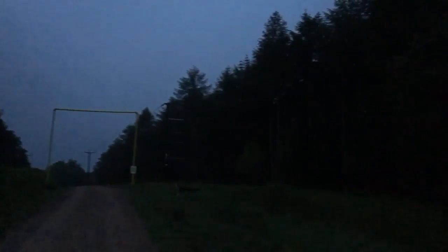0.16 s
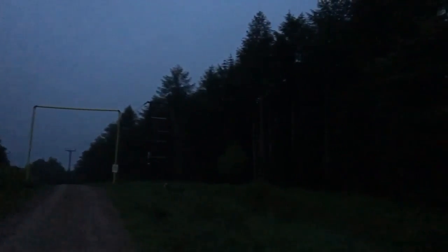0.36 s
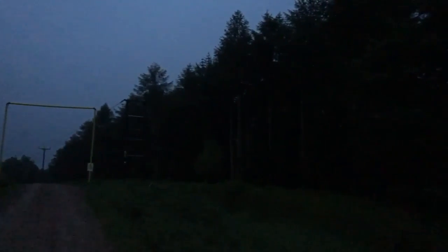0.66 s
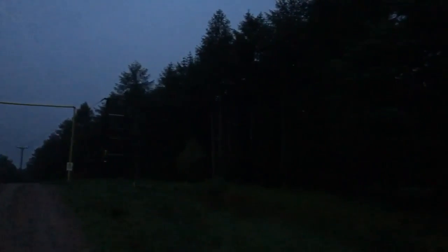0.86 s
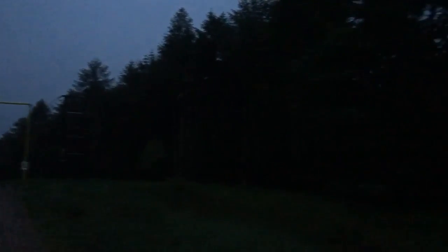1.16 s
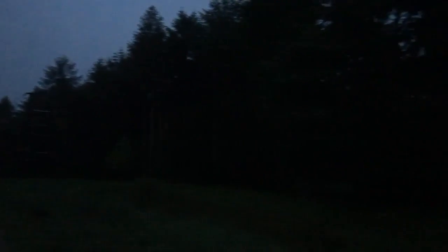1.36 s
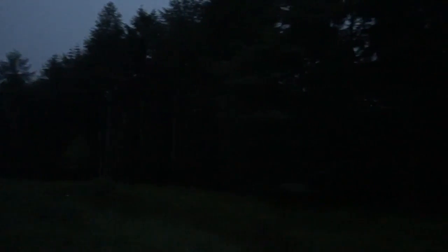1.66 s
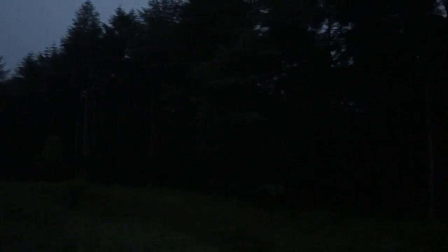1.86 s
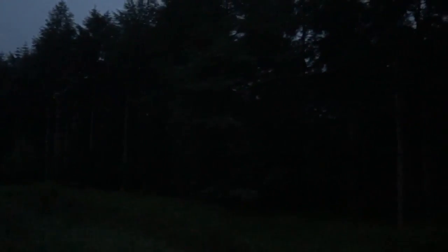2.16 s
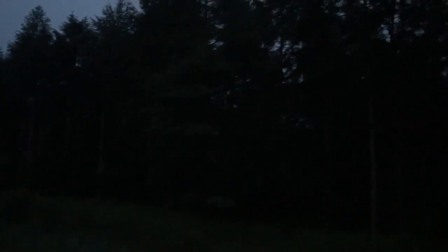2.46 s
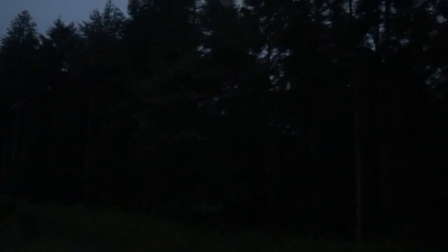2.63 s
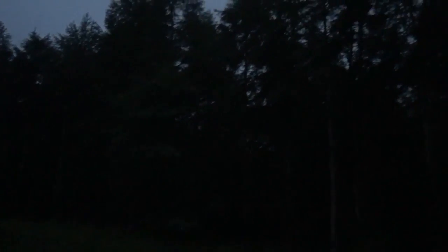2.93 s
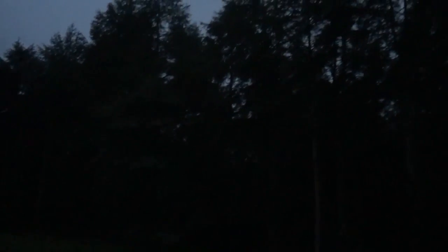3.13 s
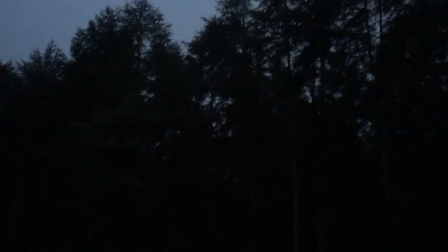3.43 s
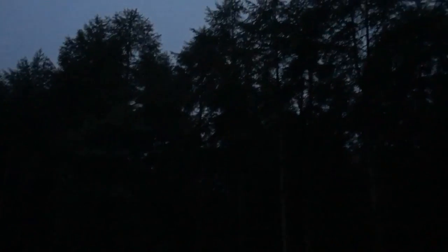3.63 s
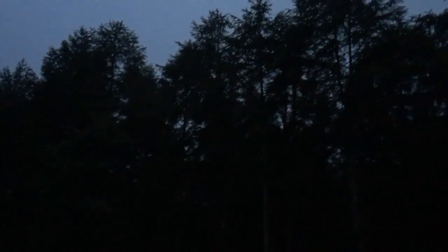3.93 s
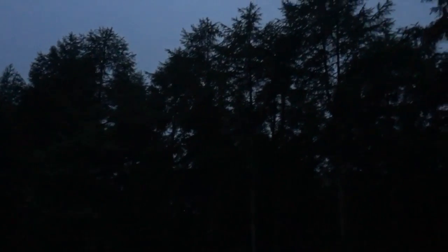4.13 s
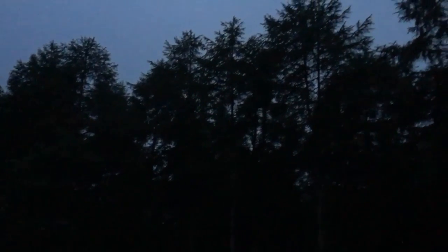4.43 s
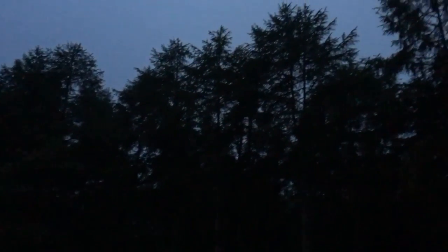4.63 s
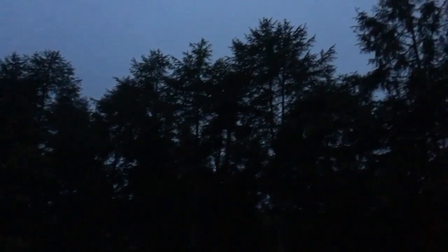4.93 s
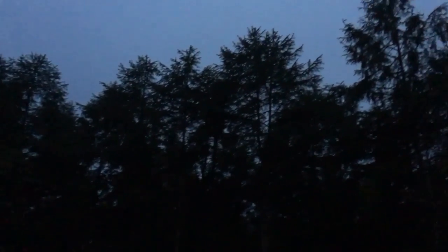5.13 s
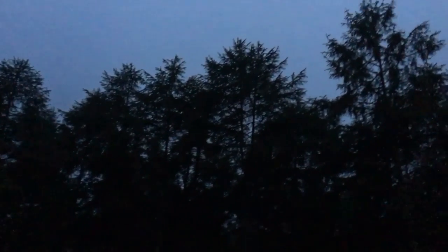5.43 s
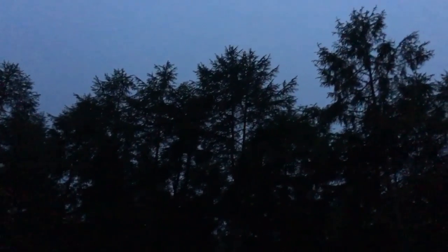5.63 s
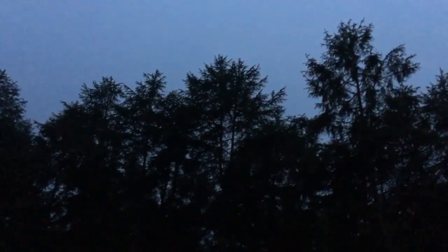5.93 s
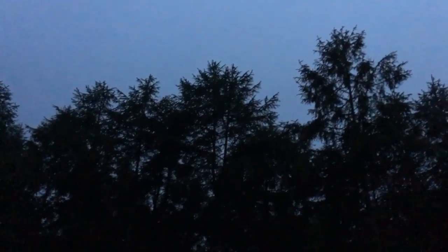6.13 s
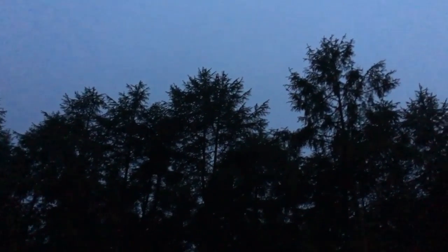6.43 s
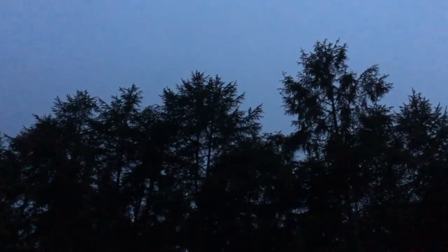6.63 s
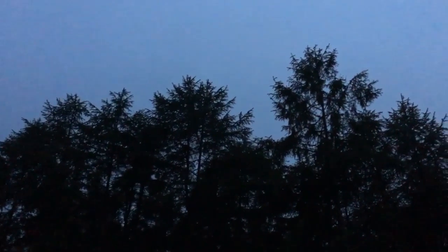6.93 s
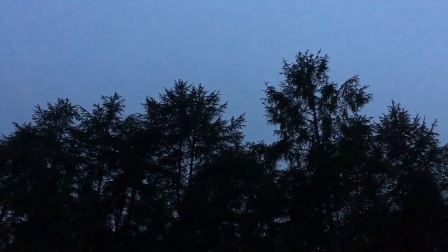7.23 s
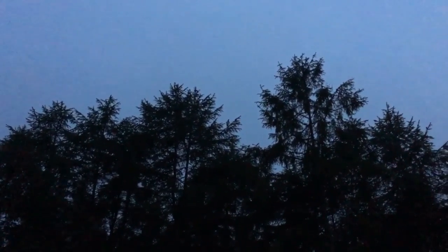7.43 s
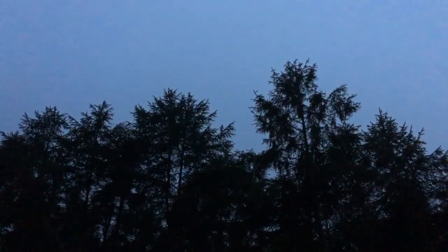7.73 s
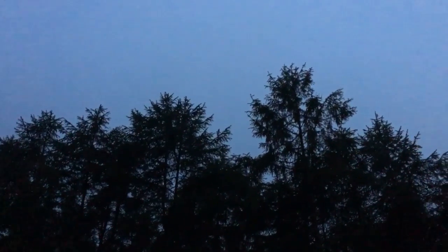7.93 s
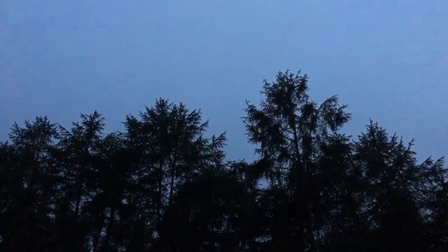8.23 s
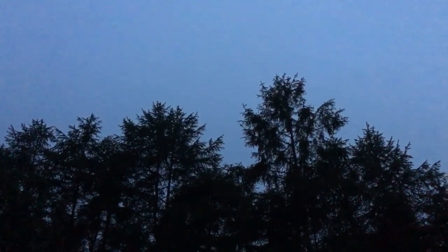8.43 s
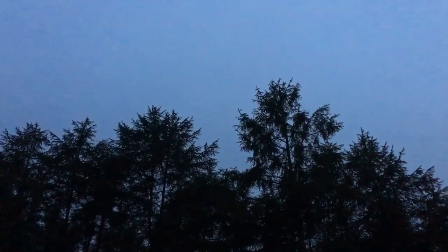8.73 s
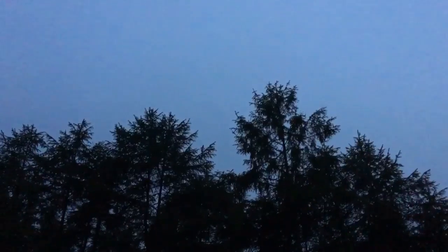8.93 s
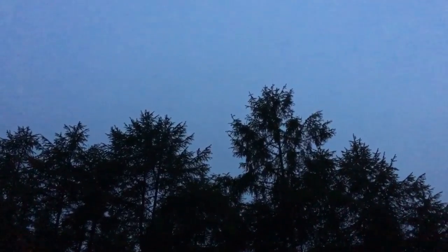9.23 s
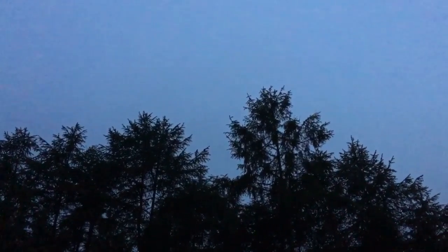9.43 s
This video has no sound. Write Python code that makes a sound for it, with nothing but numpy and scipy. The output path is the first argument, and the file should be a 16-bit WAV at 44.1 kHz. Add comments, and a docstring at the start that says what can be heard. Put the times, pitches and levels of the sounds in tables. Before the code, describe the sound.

A handheld mono microphone picks up a dense woodland dawn chorus: low mellow whistles, thin high notes, chips, trills and a few raspy buzzes, all blurred by woodland echo. Small handling squeaks open the scene over steady hiss. Wind is light at first, swells into heavy low thuds halfway through, and returns in shorter puffs while loud birds sing on.

```python
"""Dawn birds on a forest track

Many songbirds whistle, sweep and trill near and far: gliding sines, echoed by the trunks as fading noise tails.
Gusts buffet a bare mono microphone with low thuds, each a short slowing swing of pressure.
A stick-slip squeak from the hand-held camera comes early, with a faint whine at times, over steady hiss."""
import sys
import numpy as np
from scipy import signal
from scipy.fft import rfft, irfft, next_fast_len
from scipy.io import wavfile
from scipy.ndimage import uniform_filter1d

SR = 44100
rng = np.random.default_rng(int(sys.argv[2]) if len(sys.argv) > 2 else 0)


def bounce(signal):
    """Save signal as a 16-bit WAV file at the path given by the first command-line argument."""
    frames = np.transpose(np.atleast_2d(signal))
    limited = np.clip(frames, -1, 1)
    pcm = np.round(limited * 32767).astype(np.int16)
    wavfile.write(sys.argv[1], SR, pcm)


N = 422037

# notes by syllable: (delay [s], length [s], start [Hz], middle [Hz], end [Hz],
# start relative level [dB], end relative level [dB])
SYLLABLE_NOTES = { "falling trill": [(0, .028, 5550, 4720, 4300, -1, -4)],
                  "up and over": [(0, 0.0247, 5350, 5730, 5800, -11, 0),
                  (.027, .045, 5830, 6800, 7530, -2.5, -17.5), (.087, .04, 5900, 4900, 4250, -9.5, -13)],
                  "see-saw": [(0, .055, 6230, 4870, 3990, 0, -1.5), (.078, .05, 5540, 6020, 6880, -5, -8)],
                  "steep slur": [(0, .012, 5500, 5470, 5360, -1.5, -2),
                  (.012, .045, 5385, 4370, 3490, -6, -8)], "thin slur": [(0, .014, 6900, 7400, 7620, -2, 2),
                  (.014, .085, 7680, 7350, 6900, -2, 1.5), (.099, .01, 6900, 6700, 6300, 0, -6)],
                  "high arch": [(0.00093, .13, 7050, 7350, 7000, -5, -2)],
                  "hook and pipe": [(0, 0.0394, 3150, 3660, 3600, -4, -0.5),
                  (.04, .01, 3600, 3290, 2920, -7, -5), (.095, .1, 2650, 2740, 2680, -7, -3.5)],
                  "drop and hold": [(0, .02, 3750, 3460, 3250, -3, -1),
                  (.02, .09, 3240, 3147, 3080, 0.5, -7.5)],
                  "short drop": [(0, .025, 2600, 2300, 1940, -0.5, 0.5)],
                  "small arch": [(0, .065, 4000, 4330, 4000, 0, 0)],
                  "thin chip": [(0.0037, .035, 8400, 7350, 6400, -12, 0)],
                  "tick": [(0, .02, 6400, 6000, 5750, -1.5, -2.5), (0, .02, 5150, 4600, 4680, -4, -1)],
                  "steep chip": [(0, .017, 5700, 4300, 3650, -0.5, 1)],
                  "low chip": [(0.0012, 0.0279, 3050, 2300, 2070, -0.5, -4.5)],
                  "flat pipe": [(0.00061, 0.093, 3720, 3720, 3720, -1.5, -1)],
                  "low coo": [(0, .058, 1378, 1505, 1527, -5, -0.5), (0, 0.059, 2770, 3000, 3040, -14, -8)],
                  "chatter": [(0, 0.0326, 4500, 4350, 4250, -1.5, 0)]}
# repeats by syllable: (time [s], level [dB])
SYLLABLE_TIMES = { "falling trill": [(4.811, -62), (4.891, -61), (4.963, -63), (5.038, -62.5), (5.114, -62),
                  (5.191, -59), (5.266, -59), (5.341, -60), (5.417, -62), (5.487, -63), (5.572, -63)],
                  "up and over": [(6.438, -50.5), (6.6, -49), (6.766, -49), (6.927, -49), (7.098, -50.5)],
                  "see-saw": [(2.873, -62.5), (3.085, -63.5), (3.301, -64)], "steep slur": [(7.285, -57),
                  (7.4, -54.5), (7.514, -54), (7.628, -53.5), (7.743, -54)], "thin slur": [(9.005, -59.5),
                  (9.218, -61.5), (9.432, -61)], "high arch": [(.235, -78), (.68, -77), (.86, -77),
                  (1.15, -78), (2.14, -76), (2.6, -75)], "hook and pipe": [(8.515, -55), (8.815, -53.5),
                  (9.155, -53.5)], "drop and hold": [(2.03, -57.5), (2.237, -58)],
                  "short drop": [(2.245, -59), (2.338, -63), (2.528, -59.5), (2.628, -62)],
                  "small arch": [(.098, -68), (.21, -70)], "thin chip": [(8.38, -60), (8.415, -58),
                  (8.45, -57), (8.494, -57)], "tick": [(3.826, -64), (4.03, -65.5), (4.244, -68),
                  (4.502, -66.5)], "steep chip": [(.925, -69), (1.105, -69), (1.653, -62), (1.687, -65),
                  (1.734, -66), (1.83, -75), (1.936, -65.5), (2.437, -68)], "low chip": [(5.387, -59.5),
                  (5.538, -58), (5.581, -58), (6.018, -62), (5.95, -61), (6.118, -55.5), (6.166, -55),
                  (8.451, -60)], "flat pipe": [(.76, -73), (1.06, -74), (1.27, -78), (1.512, -71),
                  (1.77, -75), (1.91, -72), (2.12, -76), (2.22, -75), (2.35, -81), (4.235, -69.5),
                  (5.06, -66), (5.427, -61.5), (5.56, -73), (5.78, -61), (5.9, -71), (7.5, -67.5),
                  (7.66, -65.5), (8.66, -68), (8.957, -70), (9.36, -66.5), (9.44, -64)],
                  "low coo": [(2.207, -65.5), (2.279, -66), (2.484, -64), (2.585, -64.5)],
                  "chatter": [(7.107, -48.5), (7.155, -51.5), (7.265, -50.5), (7.297, -50), (7.335, -52),
                  (7.373, -52), (7.42, -58), (7.46, -60), (7.51, -60), (7.56, -63), (7.61, -60)]}


def undb(db):
    """Level in dB to amplitude."""
    return 10 ** (np.asarray(db) / 20)


def unit(x):
    """Scale to rms 1."""
    return x / np.sqrt(np.mean(x ** 2))


def curve(table):
    """Interpolate the columns of a (time [s], ...) table at every sample."""
    time_s, *columns = np.transpose(table)
    return [np.interp(np.arange(N) / SR, time_s, column) for column in columns]


def add(out, start_s, x):
    """Mix x into out from start_s, cropped to fit."""
    i = int(start_s * SR)
    a, b = max(i, 0), min(i + len(x), len(out))
    if b > a:
        out[a:b] += x[a - i:b - i]


def walk(rate_hz):
    """Random levels held 1 / rate_hz and slewed twice; rms 1."""
    hold = int(SR / rate_hz)
    steps = np.repeat(rng.standard_normal(N // hold + 1), hold)
    slewed = uniform_filter1d(uniform_filter1d(steps, hold), hold)
    return unit(slewed[:N])


def whistle(length_s, start_hz, middle_hz, end_hz, start_db, end_db, fade_s, turn):
    """A sine of rms level dB whose pitch follows a parabola through three points, with soft ends."""
    t = np.arange(-fade_s, length_s + fade_s, 1 / SR)
    u = 2 * t / length_s - 1  # -1 at the start, 1 at the end
    slope = (end_hz - start_hz) / 2
    bow = (start_hz + end_hz) / 2 - middle_hz
    hz = middle_hz + u * slope + u * u * bow
    edge = np.clip(np.minimum(t + fade_s, length_s + fade_s - t) / (2 * fade_s), 0, 1)
    level_db = start_db + (end_db - start_db) * t / length_s
    gain = undb(level_db) * np.sin(np.pi / 2 * edge) ** 2
    return np.sqrt(2) * gain * np.sin(2 * np.pi * (np.cumsum(hz) / SR + turn))


def forest(x, t60_s, onset_s=0.0045):
    """Scatter off wood: a noise tail of unit energy that swells in over onset_s and fades 60 dB in t60_s."""
    t = np.arange(int(1.5 * SR)) / SR
    tail = rng.standard_normal(len(t)) * undb(-60 * t / t60_s) * (1 - np.exp(-t / onset_s))
    return signal.fftconvolve(x, tail / np.sqrt(np.sum(tail ** 2)))[:len(x)]


def hiss(level_db=-68):
    """Steady noise of air and electronics, shaped in frequency."""
    # spectrum: (frequency [Hz], relative density [dB])
    hiss_spectrum = [(18, -28), (30, 4), (66, 3.5), (480, -11.5), (1140, -16), (2190, -12), (3410, -29),
                     (5460, -27), (6910, -38), (7880, -22), (15600, -30)]
    hz, db = np.transpose(hiss_spectrum)
    size = next_fast_len(N)
    bin_hz = np.arange(size // 2 + 1) * SR / size
    shape = undb(np.interp(np.log(bin_hz + 1), np.log(hz), db))
    noise = irfft(rfft(rng.standard_normal(size)) * shape, size)[:N]
    return unit(noise) * undb(level_db)


def camera(whine_hz=12000):
    """A stick-slip squeak whose body favours a few multiples of the slip rate, and a faint electronic whine."""
    # squeak bursts: (time [s], length [s], slip rate [Hz], level [dB])
    squeak_bursts = [(0.37, 0.04, 1665, -57), (0.437, 0.042, 1666, -56), (0.484, 0.027, 1670, -75),
                     (0.547, 0.036, 1700, -60.5), (0.612, 0.039, 1720, -61.5), (0.676, 0.05, 1690, -77)]
    # body response: (multiple of slip rate, relative level [dB])
    squeak_orders = [(3, 3), (5, -6.5), (6, -19), (8, -25), (9, -27.5)]
    # whine: (time [s], length [s], level [dB])
    whine_spans = [(0, 0.17, -80.5), (8.4, 1, -91)]
    squeak = np.zeros(N)
    for s, length_s, slip_hz, db in squeak_bursts:
        for k, order_db in squeak_orders:
            hz, part_db = k * slip_hz, db + order_db
            part = whistle(length_s, hz, 1.004 * hz, .985 * hz, part_db, part_db - 2.0, 0.0047, 0)
            add(squeak, s, part)
    out = squeak * undb(2.6 * walk(152.2)) + undb(-5.5) * forest(squeak, 0.71)
    for s, length_s, db in whine_spans:
        add(out, s, whistle(length_s, whine_hz, whine_hz, whine_hz, db, db, 0.027, 0))
    return out


def crowd(range_hz, base_length_s, sweep, direct_db, count):
    """Many chance notes of like strength, mostly falling, heard more as echo than directly; rms about 1."""
    lead_s = 1  # already singing before the start
    direct = np.zeros(N + lead_s * SR)
    low_hz, high_hz = range_hz
    for when, pitch, a, b, c, size in rng.random((count, 6)):
        hz = low_hz * (high_hz / low_hz) ** pitch
        bend_hz = hz * sweep * (1.406 * a - .4)
        middle_hz = hz * (1 + sweep * (c - .5) / 2)
        length_s = base_length_s * (0.392 + 1.612 * b)
        db = 9 * size
        note = whistle(length_s, hz + bend_hz, middle_hz, hz - bend_hz, db, db, 0.00582, c)
        add(direct, when * len(direct) / SR, note)
    return unit(undb(direct_db) * direct + forest(direct, 0.67))[-N:]


def far_birds():
    """Far birds too many to tell apart: low whistlers warble; the higher crowds give short steep sweeps."""
    # (time [s], low crowd level [dB], middle crowd level [dB], high crowd level [dB])
    chorus_levels = [(0.0, -56, -67, -69), (0.48, -62, -67, -78), (1.97, -62, -72, -71.5),
                     (2.93, -73, -69, -74.5), (3.33, -67, -71, -68), (4.58, -72, -69, -81.5),
                     (5.3, -72.5, -64, -76), (5.99, -66, -67, -74), (6.9, -60.5, -69, -73),
                     (7.2, -59, -62, -67.5), (7.46, -61.5, -62, -73), (9.57, -65.5, -67, -71)]
    low_db, mid_db, high_db = curve(chorus_levels)
    low = crowd((1645.5, 2889), 0.04434, 0.0709, -0.25, count=1100)
    mid = crowd((2900, 5596), .016, 0.1404, -2.3, count=1700)
    high = crowd((5500, 7486), 0.0199, 0.0506, -3.5, count=900)
    return low * undb(low_db) + mid * undb(mid_db) + high * undb(high_db)


def gust(breeze_db=-69.5, rise_db_per_s=249, fall_db_per_s=204):
    """Wind level in dB: each puff rises, holds and falls back into a light breeze; powers add."""
    # puffs: (time [s], hold [s], level [dB])
    wind_puffs = [(.1, 0.048, -55.5), (0.353, .04, -56.5), (2.682, 0.11, -61), (3.27, .05, -61),
                  (3.897, .1, -51.5), (4.029, 0.038, -44.5), (4.183, 0.018, -44), (4.292, 0.02, -44.5),
                  (4.731, 0.4, -47), (5.1, 0.52, -39), (5.7, 0.39, -42), (6.173, 0.025, -48.5),
                  (6.337, 0.18, -54.5), (6.547, 0.035, -43.5), (6.685, 0.0088, -55), (6.859, 0.062, -50.5),
                  (7.089, 0.031, -51), (7.336, 0.065, -46), (7.464, .2, -53.5), (7.697, 0.15, -44),
                  (7.968, 0.038, -52), (8.163, 0.051, -53), (8.487, 0.49, -57), (9.077, 0.051, -46),
                  (9.207, 0.14, -45.5), (9.508, 0.12, -47)]
    t = np.arange(N) / SR
    power = np.full(N, undb(2 * breeze_db))
    for s, hold_s, db in wind_puffs:
        near = slice(max(int((s - .5) * SR), 0), int((s + hold_s + .5) * SR))
        before_db = rise_db_per_s * (s - t[near])
        after_db = fall_db_per_s * (t[near] - s - hold_s)
        below_db = np.maximum(np.maximum(before_db, after_db), 0)
        power[near] += undb(2 * (db - below_db))
    return 10 * np.log10(power)


def eddy(hz, db, turn, cycles=.3, slowing=.15):
    """A vortex passing the port: about one swing of pressure that starts quick and slows."""
    u = np.arange(-2, 2, hz / SR)  # cycles from the centre
    return undb(db) / np.cosh(u / cycles) * np.cos(2 * np.pi * (u - slowing * u * u + turn))


def wind(slow_hz=48, count=900):
    """Small eddies all the time, quicker when the gust is strong, under the big ones."""
    # strongest eddies: (centre time [s], centre frequency [Hz], envelope peak [dB])
    big_eddies = [(4.184, 156, -35.5), (4.754, 155, -35), (5.111, 70, -28.5), (5.127, 141, -28.5),
                  (5.149, 57.5, -29.5), (5.238, 107, -36), (5.253, 92.5, -29.5), (5.266, 262, -25),
                  (5.273, 158, -26.5), (5.286, 213, -28.5), (5.296, 162, -32), (5.335, 91, -30),
                  (5.351, 168, -23), (5.362, 68, -27), (5.386, 166, -30), (5.4, 121, -34),
                  (5.421, 89, -28.5), (5.447, 140, -35), (5.46, 220, -26.5), (5.472, 140, -26.5),
                  (5.484, 165, -21), (5.501, 184, -29.5), (5.546, 90, -31), (5.564, 90, -35.3),
                  (5.622, 79.4, -29), (5.681, 92.5, -39), (5.785, 235, -31.5), (5.844, 135, -28.5),
                  (5.859, 118, -31), (5.892, 138, -37), (5.941, 211, -23.5), (5.95, 103, -29),
                  (6.015, 120, -39), (6.067, 130, -29.5), (6.085, 87, -28), (4.072, 131, -39.5),
                  (4.272, 109, -40), (4.722, 176, -38), (4.83, 140, -37.5), (5.024, 158, -38),
                  (6.562, 172, -38), (7.762, 159, -37.5), (7.806, 168, -37.5), (7.858, 121, -39),
                  (9.552, 141, -42), (7.343, 91, -34), (7.719, 171, -31.5), (9.301, 126, -33)]
    gust_db = gust()
    small, big = np.zeros(N), np.zeros(N)
    for when, pitch, size, turn in rng.random((count, 4)):
        octaves = np.clip((gust_db[int(when * N)] + 73.5) / 13, .3, 2.3)
        hz = slow_hz * 2 ** (octaves * pitch ** 1.5)
        add(small, when * N / SR, eddy(hz, -4.0 * np.log(size + .1), turn))
    small /= np.sqrt(uniform_filter1d(small ** 2, int(.07 * SR)) + 1e-9)  # even out the level
    for (s, hz, db), turn in zip(big_eddies, rng.random(len(big_eddies))):
        swing = eddy(hz, db, turn)
        add(big, s - len(swing) / SR / 2, swing)
    # small eddies fill what the big ones leave of the gust's power, never under 74 % of it
    gust_power = undb(2 * gust_db)
    room = gust_power - uniform_filter1d(big ** 2, int(.06 * SR))
    return big + small * np.sqrt(np.maximum(room, 0.74 * gust_power))


def buzzes(swing_hz=250, rate_hz=130):
    """The pitch swings over a hundred times a second, unevenly, so the note turns to a rasp."""
    # (time [s], length [s], start [Hz], end [Hz], level [dB])
    buzzy_notes = [(2.65, 0.162, 4450, 4300, -67.5), (2.95, 0.1, 3700, 4100, -65.5),
                   (7.04, .16, 3400, 2950, -61.5), (6.66, 0.043, 2150, 2200, -53.5),
                   (9.13, 0.083, 5000, 5000, -67)]
    out = np.zeros(N)
    uneven_hz = rate_hz * undb(1.5 * walk(40))
    shake_rad = swing_hz / rate_hz * np.sin(2 * np.pi * np.cumsum(uneven_hz) / SR)
    for s, length_s, start_hz, end_hz, db in buzzy_notes:
        add(out, s, whistle(length_s, start_hz, (start_hz + end_hz) / 2, end_hz, db, db, 0.0097, 0))
    analytic = signal.hilbert(out, next_fast_len(N))[:N]
    return np.real(analytic * np.exp(1j * shake_rad))


def trills():
    """One quick chip repeated evenly, each a little stronger or weaker."""
    # (time [s], spacing [s], chips, length [s], start [Hz], middle [Hz], end [Hz], mean level [dB])
    chip_runs = [(7.33, .0475, 7, .016, 1950, 2300, 3000, -58),
                 (1.305, .081, 4, .022, 5200, 4300, 3950, -67), (1.77, .03, 5, .014, 6200, 4900, 3800, -69)]
    out = np.zeros(N)
    for s, spacing_s, count, *note, db in chip_runs:
        for k, vary_db in enumerate(rng.standard_normal(count)):
            add(out, s + k * spacing_s, whistle(*note, db + vary_db, db + vary_db, .003, 0))
    return out


def repeaters(fade_s=.005, pitch_spread=.003):
    """Each near singer repeats its syllable, a little higher or lower every time."""
    out = np.zeros(N)
    for name, times in SYLLABLE_TIMES.items():
        for (s, db), (shift, turn) in zip(times, rng.standard_normal((len(times), 2))):
            for delay_s, length_s, *hz, start_db, end_db in SYLLABLE_NOTES[name]:
                shifted_hz = np.multiply(hz, 1 + pitch_spread * shift)
                note = whistle(length_s, *shifted_hz, db + start_db, db + end_db, fade_s, turn)
                add(out, s + delay_s - fade_s, note)
    return out


def single_whistles(fade_s=.005):
    """Whistles sung once, each a gliding sine."""
    # (time [s], length [s], start [Hz], middle [Hz], end [Hz], start level [dB], end level [dB])
    song_notes = [(0.051, 0.055, 2630, 2597, 2215, -56, -43), (0.093, 0.14, 1560, 1690, 1820, -62, -59.5),
                  (0.102, 0.14, 2180, 2172, 2310, -51, -46.5), (0.653, 0.038, 3390, 3000, 2800, -65, -63),
                  (0.658, 1.4, 5980, 6004, 5890, -83, -79), (0.673, 0.092, 1880, 1996, 2200, -53.5, -53.5),
                  (0.911, 0.043, 2130, 1845, 1370, -50.5, -72), (1.012, 0.022, 3900, 3510, 3280, -66, -58),
                  (1.015, 0.19, 2590, 2800, 3000, -63, -64), (1.144, 0.053, 1964, 1927, 2074, -53, -50),
                  (1.195, 0.12, 2043, 2086, 1997, -48, -50), (1.216, 0.04, 3200, 3093, 3150, -63, -58),
                  (1.369, 0.084, 2060, 2056, 2080, -58, -58), (1.403, 0.1, 2590, 2450, 2325, -61, -57),
                  (1.55, 0.115, 2425, 2340, 2140, -63, -54.5), (1.7, 0.04, 1950, 1870, 1800, -58, -63),
                  (1.79, 0.09, 2000, 2170, 1980, -60, -56), (0.72, 0.19, 2930, 2785, 2910, -66, -69),
                  (1.15, 0.12, 4950, 4770, 4730, -71, -75), (2.35, 0.15, 3095, 3056, 3090, -67, -71),
                  (2.37, 0.047, 2204, 2050, 1900, -64, -62), (1.96, 0.035, 1890, 2150, 2500, -57, -61),
                  (2.01, 0.057, 2600, 2550, 2480, -61, -62), (2.05, 0.04, 2100, 2000, 1910, -61, -57),
                  (2.08, 0.045, 2440, 2450, 2250, -60, -59), (2.16, 0.04, 2285, 2550, 2350, -62, -60),
                  (2.55, 0.11, 6100, 5520, 5360, -65, -62), (2.579, 0.05, 2485, 3020, 3123, -80, -58),
                  (2.734, 0.05, 7030, 6500, 6100, -70, -68), (3.09, 0.19, 7170, 7020, 6900, -74, -72),
                  (3.1, 0.23, 1797, 1836, 1774, -71.5, -70.5), (3.38, 0.12, 1950, 1804, 1810, -63.5, -72),
                  (3.72, 0.09, 2850, 2925, 2950, -67, -70), (4.655, 0.025, 6100, 5700, 5490, -70, -62),
                  (3.36, 0.1, 7050, 7090, 7110, -80, -65), (3.565, 0.12, 2910, 2305, 2603, -67, -60.5),
                  (3.626, 0.025, 7160, 7100, 6600, -76, -61), (3.674, 0.054, 2498, 2580, 2920, -62, -68),
                  (4.014, 0.28, 2044, 1927, 2125, -61.5, -74), (4.112, 0.04, 6400, 7030, 6350, -67, -74),
                  (4.424, 0.17, 2224, 2297, 2104, -61, -72), (4.446, 0.36, 8100, 7570, 7630, -75, -89.5),
                  (4.685, 0.04, 3000, 3260, 3230, -78, -56), (4.678, 0.14, 5560, 5430, 5700, -60.5, -74),
                  (4.702, 0.075, 1696, 1344, 1290, -69, -76), (4.775, 0.083, 3390, 3340, 3080, -68, -64),
                  (4.778, 0.091, 1260, 1214, 1184, -75, -74), (4.872, 0.049, 2750, 3980, 4600, -62.5, -68),
                  (5.058, 0.066, 3060, 3430, 3440, -61.5, -63), (5.203, 0.2, 1500, 1350, 1216, -79, -76),
                  (5.303, 0.048, 3820, 3550, 3050, -72, -59), (5.348, 0.1, 3340, 3335, 3030, -66, -62),
                  (5.47, 0.19, 1660, 1782, 1921, -68.5, -51.5), (5.608, 0.027, 7700, 6770, 6600, -73, -65),
                  (5.75, 0.19, 2204, 2260, 2233, -57, -50.5), (5.95, 0.17, 2270, 2198, 1890, -58.5, -54.5),
                  (5.65, 0.11, 6700, 6720, 6380, -72, -64.5), (6.008, 0.044, 6230, 4980, 4400, -69, -63),
                  (6.19, 0.2, 5570, 5480, 5480, -70, -76), (6.352, 0.17, 3950, 4250, 4230, -67, -70),
                  (6.142, 0.25, 2043, 1800, 1687, -55, -59), (6.147, 0.091, 5400, 6590, 6590, -59.5, -62.5),
                  (6.244, 0.04, 6500, 6220, 6150, -55, -75), (6.407, 0.12, 2370, 2225, 2750, -67, -56),
                  (6.539, 0.033, 2510, 2564, 2400, -54, -52), (6.571, 0.021, 2424, 2000, 1420, -43.5, -70),
                  (6.671, 0.11, 2206, 2412, 2430, -48, -86), (6.721, 0.076, 7930, 7950, 8250, -76, -69),
                  (6.824, 0.1, 2256, 2363, 2304, -49, -47.5), (6.945, 0.09, 3800, 3350, 2990, -62, -49),
                  (6.972, 0.11, 10400, 9110, 8140, -79, -76), (7.09, 0.014, 4500, 4150, 4050, -53, -50),
                  (7.07, 0.023, 2880, 2700, 2550, -57, -54), (7.49, 0.08, 1294, 1550, 1680, -72, -68),
                  (7.129, 0.17, 1880, 1885, 1794, -70, -63), (7.234, 0.035, 1990, 3130, 2120, -49, -56),
                  (7.254, 0.017, 3700, 3950, 4420, -61, -58), (7.284, 0.08, 2670, 2734, 2580, -63, -55),
                  (7.701, 0.086, 2424, 2165, 2280, -61.5, -48.5),
                  (7.848, 0.2, 7580, 7360, 7170, -68.5, -58), (7.855, 0.044, 9000, 7600, 5700, -78, -60),
                  (7.898, 0.042, 5800, 5560, 6100, -69, -55), (7.974, 0.018, 6840, 5530, 4240, -64, -48.5),
                  (7.992, 0.063, 4180, 3500, 3970, -56, -48), (8.021, 0.044, 2230, 2520, 2730, -56, -57),
                  (8.059, 0.023, 3840, 4180, 3670, -43, -52), (8.061, 0.38, 2503, 2373, 2288, -50, -71),
                  (8.11, 0.054, 6720, 5700, 4740, -56, -56), (8.17, 0.029, 4550, 4522, 4720, -46, -41.5),
                  (8.209, 0.017, 4740, 5520, 6560, -43, -69), (8.237, 0.029, 4990, 5490, 6000, -60, -53),
                  (8.288, 0.032, 6850, 5710, 5300, -66, -43.5), (8.318, 0.026, 5460, 4640, 4160, -52, -43),
                  (8.347, 0.07, 4065, 4450, 3900, -45.5, -56.5),
                  (8.488, 0.19, 1680, 1685, 1715, -65.5, -62), (9.125, 0.23, 5510, 5390, 5450, -74, -75),
                  (8.47, 0.03, 2350, 2147, 2080, -59, -55), (8.5, 0.12, 2080, 2146, 2400, -55, -51),
                  (8.86, 0.031, 3260, 3150, 3080, -58, -59), (9.079, 0.094, 3280, 3070, 3230, -62.5, -58.5),
                  (9.4, 0.041, 2656, 2510, 2370, -57, -57), (9.384, 0.044, 5050, 4930, 5330, -57, -68),
                  (9.445, 0.083, 2650, 2710, 2610, -59.5, -70)]
    out = np.zeros(N)
    for (s, *note), turn in zip(song_notes, rng.random(len(song_notes))):
        add(out, s - fade_s, whistle(*note, fade_s, turn))
    return out


def near_birds(twigs_t60_s=0.083, twigs_db=-4.5, forest_t60_s=1, echo_db=-5.5):
    """Each note arrives directly, fluttered by moving air, blurred by near branches, then as echo."""
    song = buzzes() + trills() + repeaters() + single_whistles()
    direct = song * undb(0.35 * walk(60))
    blur = undb(twigs_db) * forest(song, twigs_t60_s, onset_s=0.00077)
    echo = undb(echo_db) * forest(song, forest_t60_s)
    return direct + blur + echo


def scene():
    """Sum all sources; both channels alike."""
    mono = hiss() + camera() + far_birds() + wind() + near_birds()
    return np.array([mono, mono])


def record(dry, bass_hz=38, top_hz=15720):
    """The camera cuts the deepest bass and the top."""
    dry = signal.sosfilt(signal.butter(3, bass_hz, "high", fs=SR, output="sos"), dry)
    return signal.sosfilt(signal.ellip(10, .2, 60, top_hz, fs=SR, output="sos"), dry)


dry = scene()
out = record(dry)
bounce(out)
```